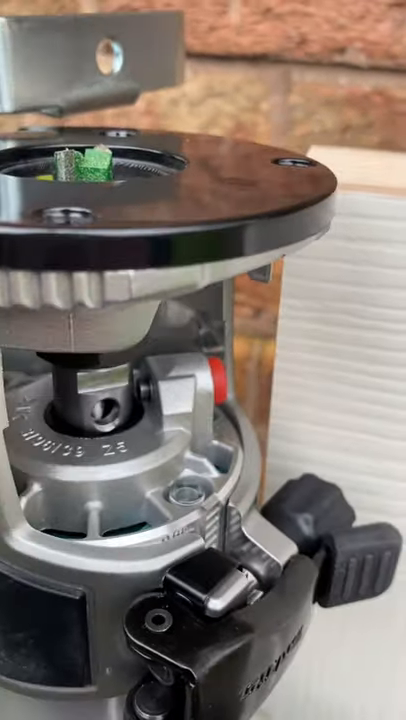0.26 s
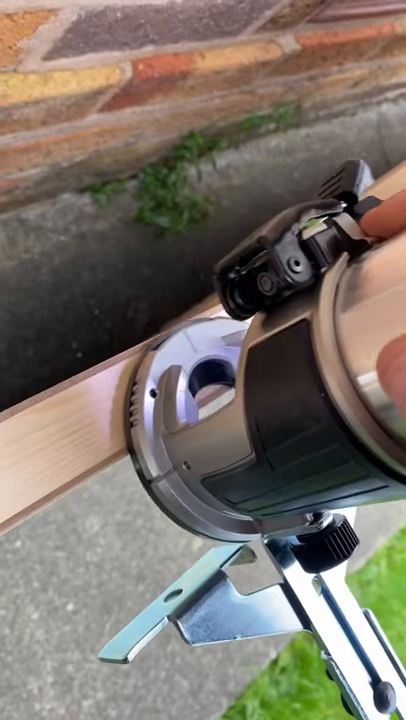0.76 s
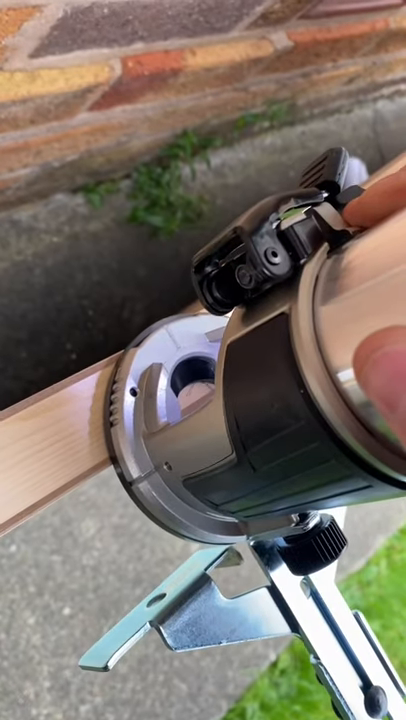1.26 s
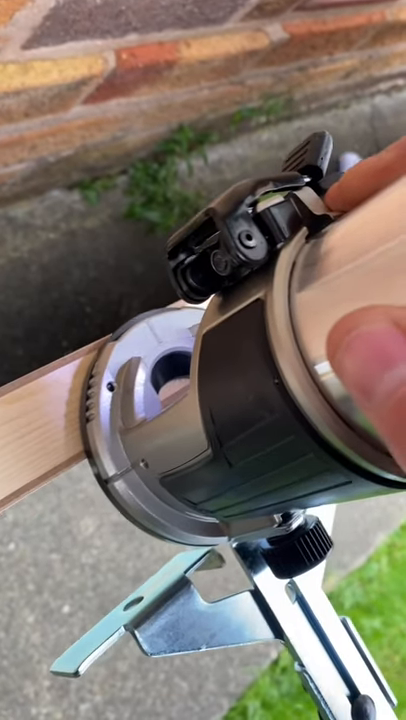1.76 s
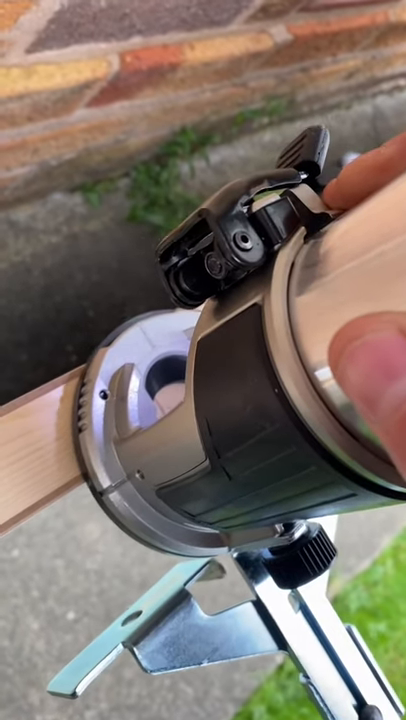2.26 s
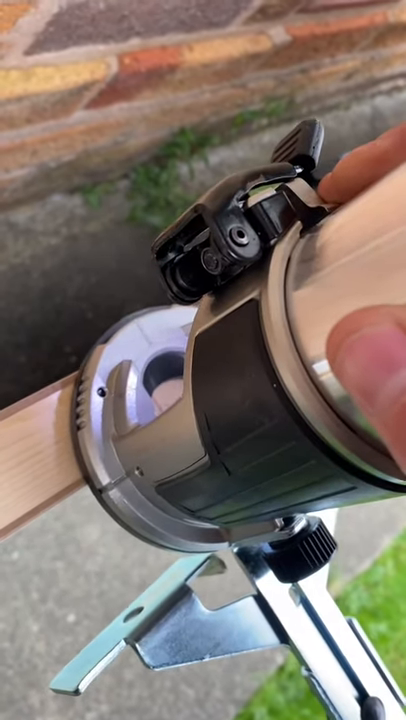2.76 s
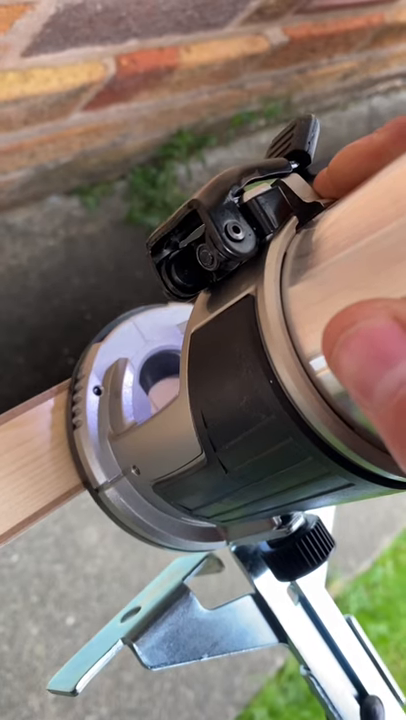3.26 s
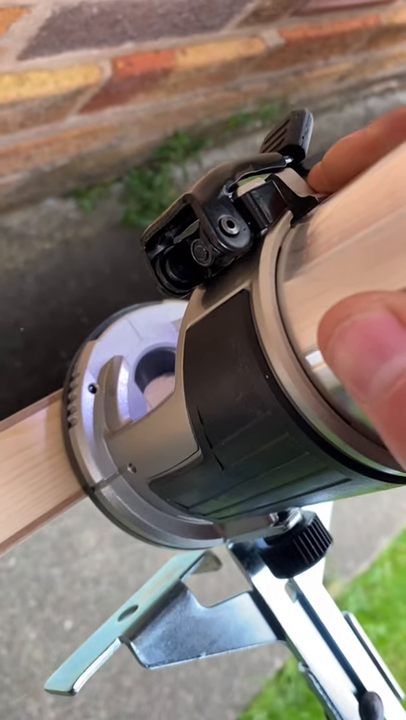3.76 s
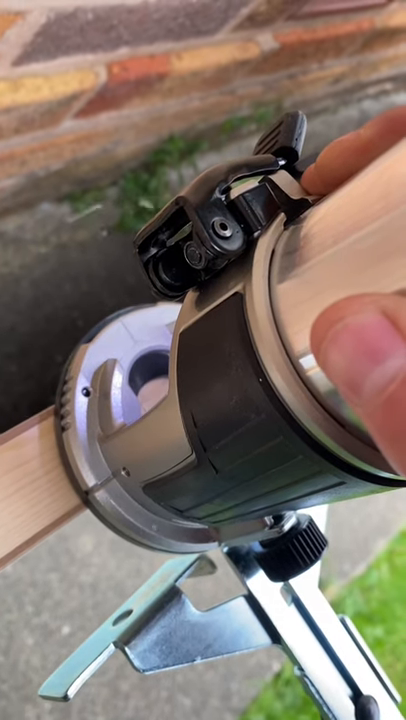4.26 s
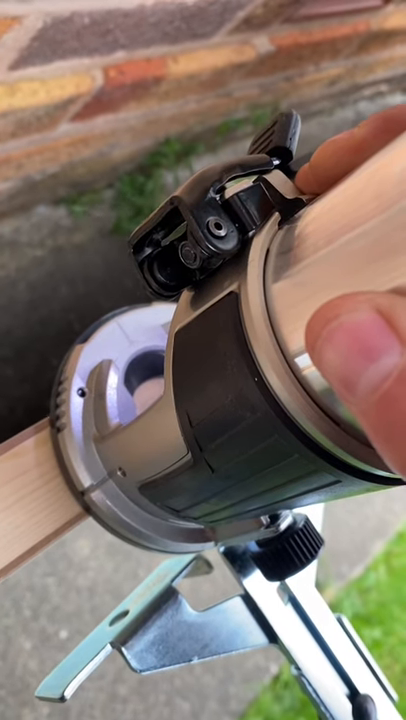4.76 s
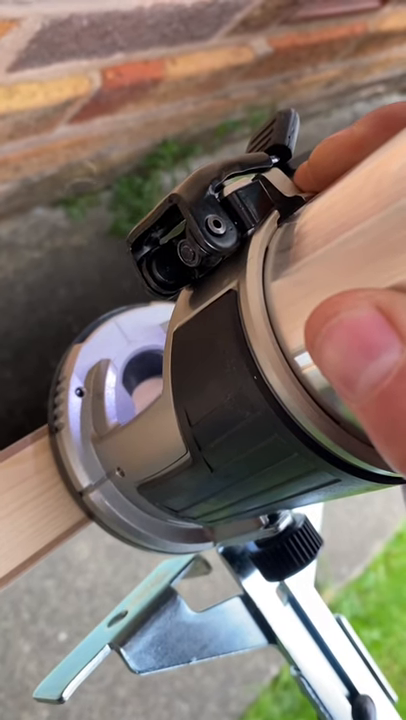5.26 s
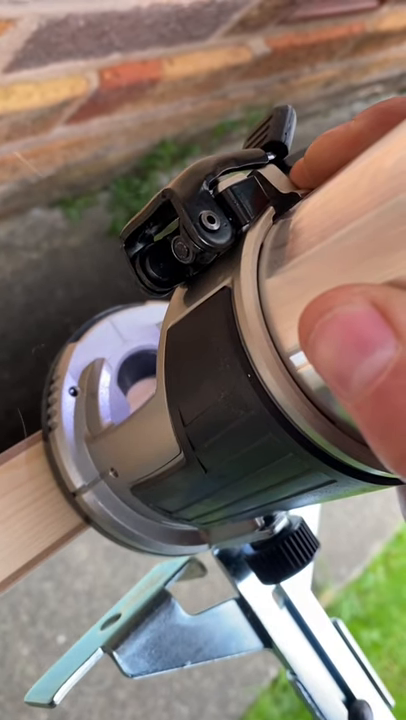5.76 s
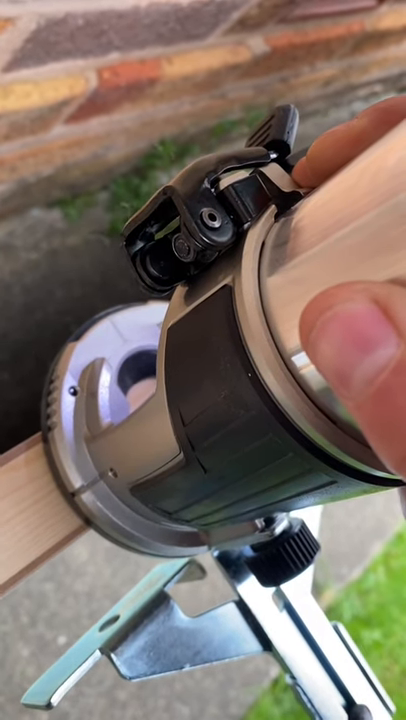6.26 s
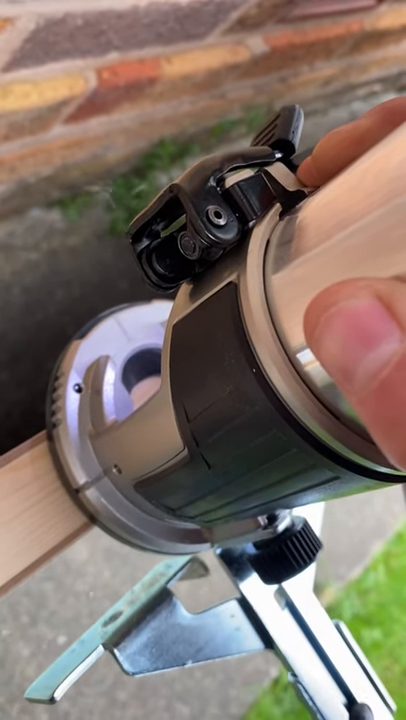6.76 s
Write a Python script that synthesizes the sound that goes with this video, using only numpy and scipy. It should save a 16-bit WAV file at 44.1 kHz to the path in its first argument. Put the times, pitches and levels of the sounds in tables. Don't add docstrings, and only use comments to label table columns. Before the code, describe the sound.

Quiet yard hiss and low wind open the scene, with sharp little ticks and one short knock. Near-silence lasts an instant, then a close handheld router roars without any run-up, bright and dense, in stereo from a phone. The whine near two kilohertz sags a little under cutting load and partly recovers; low gusts thump at the microphone, strongest in the second half.

```python
import sys
import numpy as np
from scipy import signal
from scipy.fft import rfft, irfft, next_fast_len
from scipy.io import wavfile
from scipy.ndimage import uniform_filter1d

SR = 44100
rng = np.random.default_rng(int(sys.argv[2]) if len(sys.argv) > 2 else 0)


def decibels_to_gain(level_db):
    exponent = np.asarray(level_db, float) / 20
    return 10 ** exponent


def to_wav(s):
    ch = np.atleast_2d(s).T
    pcm = np.round(np.clip(ch, -1, 1) * 32767)
    wavfile.write(sys.argv[1], SR, pcm.astype(np.int16))


N = 309582
M = next_fast_len(N)
TIME, HZ = np.arange(N) / SR, np.arange(M // 2 + 1) * SR / M + 1e-3
FADE_S, CUT_S = 0.493, .5458
SIDES = np.array([[.5], [-.5]])

# t/s, pole line f/Hz (4 x shaft speed), travel past the phone [0-1]
MOTOR = [(0.55, 1954, 0.19), (1.05, 1960, 0.04), (1.55, 1964, 0), (1.85, 1961, 0.02), (2.04, 1956, 0.04),
         (2.29, 1944, 0.08), (2.54, 1934, 0.28), (3.04, 1929, 0.26), (3.54, 1919.5, 0.63),
         (3.78, 1920, 0.3), (4.15, 1921, 0.71), (4.78, 1932, .75), (5.28, 1937.5, .85), (5.6, 1936, 0.98),
         (6.02, 1951.1, .95), (6.27, 1957, 0.76), (6.6, 1948, 1), (7.02, 1934, 1)]


def curves(table):
    s, *columns = np.transpose(table)
    return [np.interp(TIME, s, c) for c in columns]


def along_hz(table):
    hz, *columns = np.transpose(table)
    return [np.interp(np.log(HZ), np.log(hz), c) for c in columns]


def walk(rate):
    k = int(SR / rate)
    held = np.repeat(rng.standard_normal(N // k + 1), k)
    return 1.26 * uniform_filter1d(uniform_filter1d(held, k), k)[:N]


def to_time(spectra):
    return irfft(spectra, M)[..., :N]


def noise_pair(gain, likeness):
    mid, side = rfft(rng.standard_normal((2, M)))
    c = np.clip(likeness, 0, 1)
    shared, own = np.sqrt(1 + c) * mid, np.sqrt(1 - c) * side
    return np.array([shared + own, shared - own]) * gain / np.sqrt(2 * np.mean(gain ** 2))


def controls():
    free_hz, loaded_hz = 1961, 1919
    s, pole_hz, past = np.transpose(MOTOR)
    return s, (free_hz - pole_hz) / (free_hz - loaded_hz), past


def rule(free, loaded, moved, halfway=0):
    s, load, past = controls()
    return np.interp(TIME, s, free + moved * past + load * (loaded + halfway * 4 * (1 - load)))


def ports():
    # f/Hz, left leads [rad], left minus right level/dB, likeness [0-1]
    port_pair = [(60, 1.5, 1, 0.8), (203, 0, -1.3, 1), (420, 0.35, -2, 0.88), (600, -0.5, -3.5, 1),
                 (810, 0, -1, 0.99), (1200, 0, 0, 1), (2060, 0, 0, 1), (2480, -1, -6, 0.55),
                 (2800, -2.5, -4.5, 0.85), (3100, -3, 2.5, 0.92), (3220, -3.5, 3.5, 0.16),
                 (3960, -5.5, -1.5, 0.86), (4270, -5.5, -3.5, 0.14)]
    # f/Hz, left leads [rad], likeness [0-1]
    port_lag = [(5400, -6, 0.94), (6090, -4.5, 0.75), (6866, -3.45, 0.98), (6600, -3.5, 1),
                (8040, -3, 0.98), (8840, -1.1, 0.9), (9700, -1.8, 1), (11150, 0.06, .98), (12160, 1.8, .7),
                (12900, 3, 1), (14500, 3.5, 0.95), (15060, 4.5, .72), (15600, 8, .9)]
    lead, pan_db, likeness = along_hz(port_pair + [(hz, rad, 0, alike) for hz, rad, alike in port_lag])
    half = decibels_to_gain(pan_db / 2) * np.exp(.5j * lead)
    return np.array([half, 1 / half]), likeness


def shaft_angle():
    pole_hz, _ = curves(MOTOR)
    tremble = 1 + 0.000518 * walk(6) + 0.00029 * walk(40)
    return 2 * np.pi * np.cumsum(pole_hz / 4 * tremble) / SR


def shaft_lines(angle):
    orders_sung = [4, 8, 4.098, 1, 2, 3, 5, 6, 7, 9, 10, 16]
    sung = [(-30, 1, 2, 0), (-28, -2, -8.5, -.5), (-37, -4.5, 6.5, -1), (-44, -8.5, 6, -3),
            (-37.5, -6, -3, 3), (-45.5, 9.5, 0, 3.5), (-44.5, 2.5, 1, -0.5), (-48.5, 9.5, 3.5, -4),
            (-47, 1, 2, 1.5), (-56.5, 10.5, 0.5, 1), (-50, 2, -1, 6.5), (-47, 0, 3.5, 0)]
    aside = {1: (0.63, 0.23, 6.5), 2: (0.031, 0, 0), 6: (.1, 0.54, 4), 7: (3.1, -1.7, 0),
             8: (-0.33, 0.98, -0.81), 9: (1, 0.095, -1.99)}
    waver_depth_db = {1: 2.0, 2: 1.8, 4: .9, 8: 1.6, 4.098: 1.2}
    _, past = curves(MOTOR)
    out = 0
    for order, levels in zip(orders_sung, sung):
        level_db = rule(*levels) + waver_depth_db.get(order, 3.3) * walk(20)
        lead, moved, pan_db = aside.get(order, (0, 0, 0))
        phase = order * angle + 2 * np.pi * rng.random() + SIDES * (lead + moved * past)
        out = out + decibels_to_gain(level_db) * decibels_to_gain(SIDES * pan_db) * np.sin(phase)
    return out


def ball_race(angle):
    # t/s, level/dB
    race_level = [(.55, -43), (1.1, -31), (1.45, -28), (1.95, -38), (2.3, -40), (2.6, -41), (4.2, -49),
                  (4.7, -43), (5.3, -37.5), (6.7, -35), (7.02, -38)]
    pole_hz, _ = curves(MOTOR)
    race_hz = pole_hz * rule(2.411, -.016, .019)
    balls = 2 * np.pi * np.cumsum(race_hz * (1 + 0.00248 * walk(50))) / SR
    pan_db = rule(1.5, 0, -12.5)
    whistle_db = curves(race_level)[0] + 3.4 * walk(25) + SIDES * pan_db - 4
    out = decibels_to_gain(whistle_db) * np.sin(balls)
    sum_db = rule(-43.5, 2, 0.5) + 4.8 * walk(10)
    out = out + decibels_to_gain(sum_db) * np.sin(balls + 4 * angle + 1.2 * walk(60))
    partial_db = rule(-58, -16, 22) + 4.02 * walk(9)
    return out + decibels_to_gain(partial_db) * np.sin(2.425 * balls)


def whine(angle):
    tones = shaft_lines(angle) + ball_race(angle)
    return np.sqrt(2) * to_time(rfft(tones, M) * ports()[0])


def roar(angle):
    # f/Hz, level/dB per Hz
    roar_colour = [(40, -60), (130, -34), (250, -26.5), (380, -30), (500, -21.5), (650, -23.5), (800, -16),
                   (2100, -24.5), (2650, -20), (4200, -24.5), (6500, -20), (8300, -23.5), (10000, -28.5),
                   (16000, -34.5)]
    # f/Hz, width/Hz, level/dB per Hz
    housing = [(956, 100, -15.5), (1158, 109, -12), (1366, 162, -10), (1675, 190, -15), (1934, 140, -21),
               (2251, 133, -13), (2455, 83, -21), (3020, 330, -15), (3510, 250, -21.5), (3860, 220, -21.5),
               (4715, 100, -18.5), (4920, 530, -24.5), (6500, 270, -34), (11330, 2600, -30)]
    cutter_pan = (-4.5, 1, 6.5)
    power = decibels_to_gain(2 * along_hz(roar_colour)[0])
    for hz, width, db in housing:
        power = power + decibels_to_gain(2 * db) / (1 + (2 * (HZ - hz) / width) ** 4)
    heard, likeness = ports()
    spectra = noise_pair(np.sqrt(power), likeness) * heard
    body_db = rule(-26.5, -0.27, 0.12)
    cutter_db = rule(-1.73, -3.5, 5.5)
    fan_db = rule(1.08, -.6, -0.96)
    edges = [0, 400, 1050, 1550, 2100, 2750, 2950, 3600, 5000, 7500, 10000, SR]  # bands, Hz
    out, feed = 0, walk(6)
    for lo, hi in zip(edges, edges[1:]):
        treble = lo / 9000
        change_db = cutter_db if lo == 2950 else fan_db * (lo > 2950)
        if lo in (2750, 2950):
            change_db = change_db + SIDES * rule(*cutter_pan)
        flicker_db = treble * (.4 * feed + 0.72 * walk(150)) + 0.66 * (1 - treble / 2) * walk(14)
        band = to_time(spectra * ((HZ >= lo) & (HZ < hi)))
        out = out + decibels_to_gain(change_db + flicker_db) * band
    throb = 1 + .055 * np.cos(angle)
    return out * decibels_to_gain(body_db + 3.5) * throb


def ring(s, db, hz, t60, rise_s=0.00046):
    t = np.maximum(TIME[:SR] - s, 0)
    envelope = (1 - np.exp(-t / rise_s)) * np.exp(-np.log(1000) * t / t60)
    return np.pad(decibels_to_gain(db) * np.sin(2 * np.pi * hz * t) * envelope, (0, N - SR))


def knock():
    # t/s, peak level/dB, left minus right level/dB
    blow = [
        (0.404, -41, 7),
    ]
    # f/Hz, level/dB, t60/s
    blow_modes = [(604, 4, 0.019), (810, -6, .012), (1300, -1, 0.0071), (1750, -5, .009), (2700, -24, .009),
                  (4700, -21, .009), (112, -3, 0.082)]
    (s, db, pan_db), = blow
    modes = sum(ring(s + 0.00055 + .7 / hz, db + mode_db, hz, t60) for hz, mode_db, t60 in blow_modes)
    return modes * decibels_to_gain(SIDES * pan_db)


def echo(s, db, hz, width, t60):
    wash = to_time(noise_pair(1 / (1 + (2 * (HZ - hz) / width) ** 4), .5))
    return wash * decibels_to_gain(db - 60 * np.maximum(TIME - s, 0) / t60) * (TIME > s)


def ticks():
    # t/s, peak level/dB, f/Hz, t60/s
    taps = [
        (.004, -57, 4600, .024),
        (.3618, -48, 4650, .005),
        (.3622, -52, 4300, .005),
    ]
    # t/s, level/dB, f/Hz, width/Hz, t60/s
    wall_scatter = [
        (.364, -73, 4600, 1500, .15),
        (.407, -75, 2600, 1500, .08),
    ]
    return sum(ring(*tap) for tap in taps) + sum(echo(*row) for row in wall_scatter)


def gusts():
    # t/s, level/dB, hold/s, extra treble level/dB
    gust_list = [(.82, -58, .03, 13), (1.168, -60, 0.059, 20.5), (1.47, -48.5, .04, 12.5),
                 (1.62, -51.5, 0.15, 0), (1.86, -48, 0.033, 0), (1.994, -45, .01, -8),
                 (2.09, -45, 0.21, -3), (2.439, -41, 0.0074, 1), (2.58, -49, .01, -5),
                 (2.69, -55, 0.039, -2), (2.96, -49, .02, -2), (3.13, -44, 0.0089, 0),
                 (3.252, -47, .02, -2), (3.39, -49, .01, -2), (3.49, -51, .06, 0), (3.771, -51, .02, 0),
                 (4.12, -46, .01, 2), (4.266, -39.5, 0.022, 0), (4.362, -48.5, .22, 3),
                 (4.689, -39.5, 0.017, 7), (4.796, -39.5, 0.0086, 4), (4.91, -41, 0.14, 0),
                 (5.26, -41, .03, -8), (5.52, -42, 0.019, 0), (5.679, -44, 0.019, 5), (5.87, -43, .02, 0),
                 (5.951, -48, 0.17, 0), (6.359, -49, .11, 6), (6.69, -49, .03, 0), (6.94, -55, 0.021, -3)]
    rise_db_s, fall_db_s, lull_db = 200, 152, -57
    calm_s, calm_db = 0.89, -11
    t = TIME[::64]
    low_db = high_db = lull_db + calm_db * np.clip(1 - (t - calm_s) / .5, 0, 1)
    for s, db, hold_s, treble_db in gust_list:
        rise = rise_db_s * np.maximum(s - t, 0)
        fall = fall_db_s * np.maximum(t - s - hold_s, 0)
        shape_db = db - rise - fall
        low_db, high_db = np.maximum(low_db, shape_db), np.maximum(high_db, shape_db + treble_db)
    return np.interp(TIME, t, decibels_to_gain(low_db)), np.interp(TIME, t, decibels_to_gain(high_db))


def wind():
    # f/Hz, level/dB per Hz
    wind_colour = [(12, -40), (25, -19), (45, 1.5), (90, -1.5), (125, -8.5), (200, -18), (320, -27.5),
                   (500, -44), (1000, -90)]
    # t/s, level/dB
    wind_before = [(0.0, -48), (0.168, -49.5), (0.194, -50), (0.284, -47), (0.33, -53), (0.36, -48),
                   (0.426, -47), (0.488, -52), (0.5, -67)]
    spectra = noise_pair(decibels_to_gain(along_hz(wind_colour)[0]), 0.97)
    share = 1 / (1 + (HZ / 110) ** 4)
    early = decibels_to_gain(curves(wind_before)[0])
    out = 0
    for part, gain in zip((share, 1 - share), gusts()):
        out = out + to_time(spectra * part) * np.where(TIME < CUT_S, early, gain)
    return out * decibels_to_gain(1.5 * walk(20))


def yard():
    yard_levels = [
        (-70, 10, .06),
        (-83, 20, 0.089),
    ]
    # f/Hz, level/dB per Hz
    yard_colour = [(120, -29), (200, -5), (645, -16), (997, -15), (3210, -35.5), (5620, -33), (7050, -47),
                   (8700, -33), (13000, -37)]
    spectra = noise_pair(decibels_to_gain(along_hz(yard_colour)[0]), .1)
    low_db, high_db = (db + extra_db * np.exp(-TIME / s) for db, extra_db, s in yard_levels)
    low = to_time(spectra * (HZ < 2000))
    high = to_time(spectra * ((HZ >= 2000) & (HZ < 14500)))
    return low * decibels_to_gain(low_db) + high / high.std() * decibels_to_gain(high_db)


def scene():
    angle = shaft_angle()
    router = whine(angle) + roar(angle)
    tail = decibels_to_gain(-22) * np.clip((FADE_S + 0.018 - TIME) / 0.026, 0, 1)
    before = np.clip((FADE_S - TIME) / .004, 0, 1) + tail
    after = np.clip((TIME - CUT_S) / 0.00055, 0, 1)
    return (yard() + knock() + ticks()) * before + wind() * (before + after) + router * after


def roll_off(x):
    return signal.sosfilt(signal.butter(12, 17110, fs=SR, output="sos"), x)


def record(dry):
    dry = signal.sosfilt(signal.butter(2, 45, "high", fs=SR, output="sos"), dry)
    dry = signal.sosfilt(signal.ellip(14, .2, 80, 15680, fs=SR, output="sos"), dry)
    return roll_off(dry)


dry = scene()
out = record(dry)
to_wav(out)
```